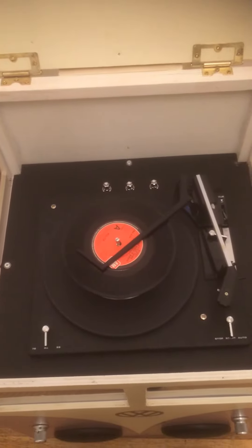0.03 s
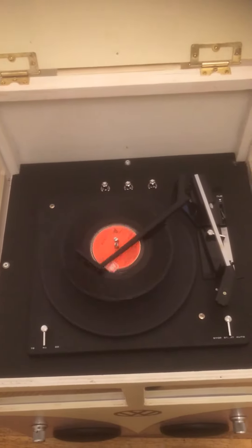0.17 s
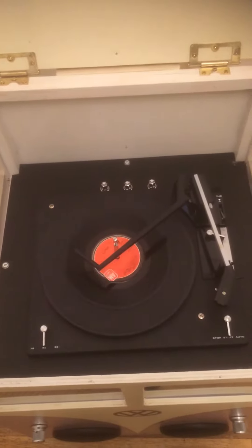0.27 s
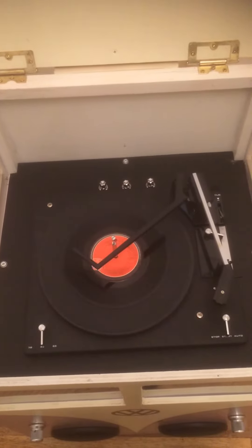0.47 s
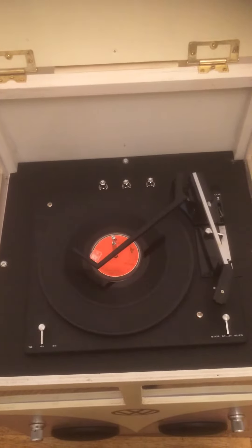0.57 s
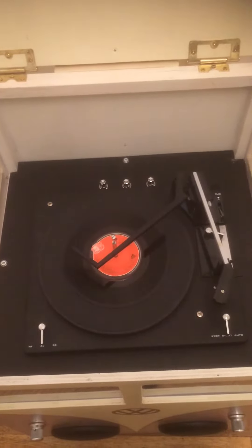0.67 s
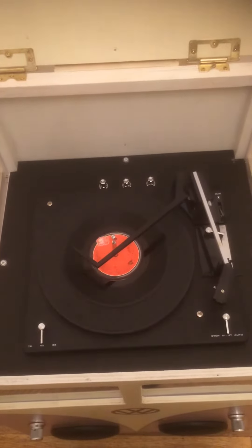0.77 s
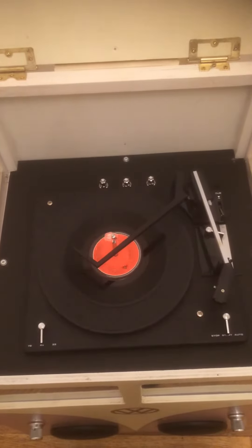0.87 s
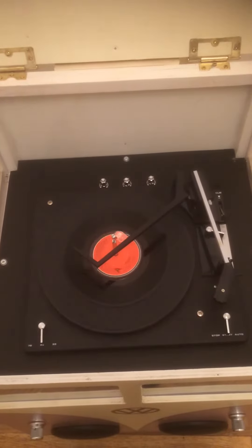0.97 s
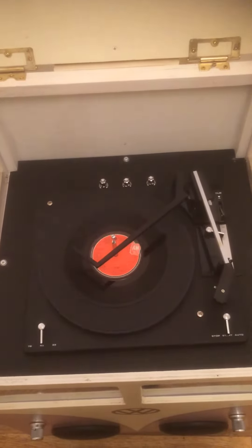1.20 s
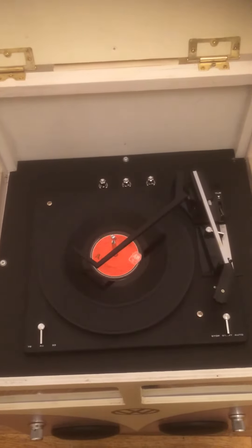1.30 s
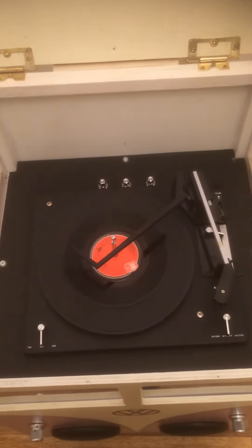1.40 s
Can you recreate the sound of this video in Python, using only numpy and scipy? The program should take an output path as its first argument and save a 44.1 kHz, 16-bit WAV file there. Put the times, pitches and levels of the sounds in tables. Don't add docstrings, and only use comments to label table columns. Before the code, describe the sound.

A record changer in a wooden case, heard close in a quiet room: faint tick, a disc drops with a rattling thump, a spring pings, the arm linkage clunks hard, then later a bright latch snap.

```python
import sys
import numpy as np
from scipy import signal
from scipy.fft import rfft, irfft
from scipy.io import wavfile
from scipy.ndimage import uniform_filter1d

SR = 44100
rng = np.random.default_rng(int(sys.argv[2]) if len(sys.argv) > 2 else 0)


def nominal_scale(level):
    x = np.asarray(level, float) / 20
    return 10 ** x


def to_wav(sig):
    pcm = np.clip(np.atleast_2d(sig), -1, 1) * 32767
    pcm = np.round(pcm).astype(np.int16)
    wavfile.write(sys.argv[1], SR, pcm.T)


N = 63945

# start in seconds, level in dB.
GRAZE_HITS = [
    (.2113, -41.5),
]
# frequency in Hz, level in dB.
GRAZE_COLOUR = [(2000, -22), (3500, -11), (5300, -10.5), (9000, -29), (15000, -22)]
# start in seconds, level in dB.
RIM_HITS = [
    (.2185, -34.5),
    (.2225, -37),
    (.2255, -37.5),
    (.2290, -29),
    (.2325, -33.5),
    (.2395, -33),
    (.2480, -39.5),
]
# frequency in Hz, level in dB, T60 in seconds.
DISC_MODES = [(919, -9.5, 0.2), (1347, -3, 0.071), (1850, -12, 0.11), (1925, -2, 0.051),
              (2782, -5.5, 0.097), (3740, -7.5, .09), (4392, -10.5, 0.053), (5170, -4.5, 0.031),
              (5500, -21, 0.039), (7000, -4, 0.018), (6760, -7, 0.042), (8390, -4.5, 0.029),
              (8700, -20, 0.028), (11300, -12, .04)]
# frequency in Hz, level in dB.
RATTLE_COLOUR = [(180, -15), (300, -7.5), (689, -26), (870, -20.5), (2000, -5.5), (2520, -15.5),
                 (8500, -22), (16000, -35)]
# start in seconds, level in dB.
DECK_PUSHES = [
    (.2183, -36.5),
    (.2249, -39.5),
    (.2400, -37),
    (.2700, -39),
    (.3045, -30),
    (.3100, -34),
    (.4400, -52),
    (1.2150, -56),
    (1.3850, -53),
]
# frequency in Hz, level in dB, T60 in seconds.
DECK_MODES = [(188, -4.5, 0.046), (212, -1.5, 0.14), (284, 0, 0.068), (510, -3.5, 0.065), (80, -12, 0.096)]
# start in seconds, level in dB, seconds until it settles.
DECK_BOUNCES = [
    (.2183, -37.5, .046),
    (.2249, -29, 0.072),
    (.3045, -35, 0.054),
    (.3400, -42.5, 0.059),
]
# start in seconds, level in dB.
THUD_HITS = [
    (1.3350, -54.5),
    (1.3550, -58),
]
# frequency in Hz, level in dB.
THUD_COLOUR = [(40, 3), (80, 1), (350, -5), (600, -14), (1200, -33.5)]
# start in seconds, level in dB, seconds until it is caught.
LEVER_PINGS = [
    (0.202, -48.5, 0.0058),
    (.2660, -20, 0.016),
]
# start in seconds, level in dB, seconds until it is caught.
LEVER_RINGS = [
    (.3100, -34, .195),
]
# start in seconds, level in dB.
ARM_BLOWS = [
    (.2985, -25),
    (.3042, -26),
    (.3062, -20),
    (.3100, -21.5),
    (.3190, -28.5),
    (.3255, -30),
]
# frequency in Hz, level in dB, T60 in seconds.
CHASSIS_MODES = [(780, -19, 0.0206), (939, 5, 0.037), (1030, -8, 0.015), (1080, -22, 0.015),
                 (1236, 3.5, .04), (1300, 1.5, 0.039), (1444, 0, .04), (1671, -7.5, 0.08),
                 (1830, -35, 0.047), (2048, -5, .07), (2927, -2, 0.014), (3467, -14, 0.022),
                 (4610, -18, .02), (5530, -15, .015)]
# frequency in Hz, level in dB.
BLOW_COLOUR = [(300, -18.5), (620, -12.5), (1100, 7.5), (2100, -5), (4000, -11.5), (7000, -24),
               (12000, -32), (17000, -52)]
# frequency in Hz, level in dB.
TICK_COLOUR = [(3000, -18), (5000, -4.5), (8500, 3), (11000, -7), (12500, -29), (17000, -19)]
# start in seconds, level in dB.
LATCH_SLIP = [
    (1.1605, -50),
]
# start in seconds, level in dB.
LATCH_SNAPS = [
    (1.1632, -28),
    (1.1645, -27),
    (1.1657, -28.5),
    (1.1685, -28.5),
    (1.1750, -48),
]
# frequency in Hz, level in dB, T60 in seconds.
LATCH_MODES = [(868, -8.5, 0.05), (1060, -9, 0.048), (1539, -3, 0.056), (1734, -8, 0.1),
               (2010, -5.5, 0.013), (2430, -14, 0.034), (4350, -3, 0.02), (5270, 1.5, 0.013),
               (6140, -1, 0.028), (8500, -5, 0.042), (10230, 6.5, 0.017), (11960, -19, 0.023),
               (11300, -24, 0.034), (13800, -13, 0.022)]
# frequency in Hz, level in dB.
SNAP_COLOUR = [(180, -30), (300, -13), (865, -18), (1230, -7.5), (1970, -5.5), (3430, -11.5),
               (10800, -11.5), (15800, -10), (16700, -54)]
# start in seconds, level in dB, pitch in Hz, crack level in dB.
GEAR_TEETH = [
    (0.119, -63, 1140, 4),
    (0.1811, -55, 1300, 3.5),
    (0.624, -60, 1940, -2),
    (0.782, -59.5, 1625, -24),
    (0.859, -62, 1990, -10),
    (.9390, -52.5, 1627, -17),
    (1.3828, -58, 1000, 6.5),
    (1.386, -52.5, 1567, 0.5),
    (1.400, -59, 1820, -8),
]
# frequency in Hz, level in dB.
TOOTH_COLOUR = [(300, -5), (900, -4), (2000, -5.5), (3500, -8.5), (4500, -26), (6500, -18), (12000, -37)]
# frequency in Hz, T60 in seconds.
ROOM_DECAY = [(100, 0.43), (300, .35), (1000, 0.41), (2000, 0.46), (4000, 0.42), (8000, 0.34),
              (15000, 0.22)]
# frequency in Hz, line width in Hz, level in dB.
MOTOR_HUM = [
    (60, 12, -69),
    (154, 20, -72),
]
# frequency in Hz, level in dB.
HISS_COLOUR = [(20, -13), (60, -15), (156, -8.5), (300, -14), (620, -18), (1400, -19.5), (3000, -28),
               (15300, -36)]
# frequency in Hz, level
# in dB.
MIC_TONE = [(15, -28), (45, -3.5), (90, -1), (480, -0.5), (620, -2), (800, -1),
            (15600, 0), (16000, -20), (16800, -28), (17000, -90)]


def read(points, hz):
    f, value = np.transpose(points)
    return np.interp(np.log(hz + 1), np.log(f + 1), value)


def add(mix, s, sound):
    part = mix[round(s * SR):][:len(sound)]
    part += sound[:len(part)]


def noise(colour, size):
    spectrum = rfft(rng.standard_normal(size))
    x = irfft(spectrum * nominal_scale(read(colour, np.fft.rfftfreq(size, 1 / SR))), size)
    return x / x.std()


def strike(hits, modes, spread_db=3.0, crack=None, crack_db=0, crack_t60=0.1):
    out, t = np.zeros(N), np.arange(SR // 2) / SR
    hz, db, t60 = np.transpose(modes)[:, :, None]
    contact_s, pitch_scatter = 0.0006, 0.025
    for s, hit_db in hits:
        place_db = spread_db * rng.standard_normal(hz.shape)
        pitch = 1 + pitch_scatter * rng.standard_normal(hz.shape)
        sides = rng.choice([-1, 1, 1], hz.shape)
        fall = nominal_scale(db + place_db - 60 * t / t60)
        ring = (fall * sides * np.sin(2 * np.pi * hz * pitch * t)).sum(0)
        sound = ring / np.linalg.norm(nominal_scale(db))
        if crack is not None:
            sound = sound + noise(crack, len(t)) * nominal_scale(crack_db - 60 * t / crack_t60)
        add(out, s, nominal_scale(hit_db) * sound * np.minimum(t / contact_s, 1))
    return out


def burst(hits, colour, t60):
    return strike(hits, [(1000, 0, 1e-5)], 0, colour, 0, t60)


def held(rows, hz, t60, caught_t60):
    out, t = np.zeros(N), np.arange(SR // 2) / SR
    attack = np.minimum(t / 0.00064, 1)
    for s, db, free_s in rows:
        fall_db = 60 * t / t60 + 60 * np.maximum(t - free_s, 0) / caught_t60
        add(out, s, nominal_scale(db - fall_db) * attack * np.sin(2 * np.pi * hz * t))
    return out


def landing():
    graze = burst(GRAZE_HITS, GRAZE_COLOUR, t60=0.05)
    rattle = strike(RIM_HITS, DISC_MODES, 3.0, RATTLE_COLOUR, crack_db=2, crack_t60=0.037)
    deck = strike(DECK_PUSHES, DECK_MODES)
    thuds = burst(THUD_HITS, THUD_COLOUR, t60=0.16)
    return graze + rattle + deck + thuds


def deck_bounce():
    return held(DECK_BOUNCES, hz=151, t60=0.26, caught_t60=0.04)


def linkage():
    tick = burst([(0.2982, -25)], TICK_COLOUR, t60=0.0063)
    blows = strike(ARM_BLOWS, CHASSIS_MODES, 1.7, BLOW_COLOUR, crack_db=-3.5, crack_t60=0.03)
    return blows + tick


def lever():
    pings = held(LEVER_PINGS, hz=1297, t60=0.085, caught_t60=0.012)
    rings = held(LEVER_RINGS, hz=1321, t60=0.5, caught_t60=0.5)
    return pings + rings


def latch():
    slip = strike(LATCH_SLIP, LATCH_MODES[2:6])
    snap = strike(LATCH_SNAPS, LATCH_MODES, 2.5, SNAP_COLOUR, crack_db=-5.5, crack_t60=0.064)
    return slip + snap


def gears():
    out, tooth_t60 = np.zeros(N), 0.042
    for s, db, hz, crack_db in GEAR_TEETH:
        modes = [(hz, 0, tooth_t60), (hz * 1.15, -6, tooth_t60)]
        out = out + strike([(s, db)], modes, 0, TOOTH_COLOUR, crack_db, crack_t60=0.035)
    return out


def room(x):
    delay_s, blur_hz = 0.0038, 25
    hz, t, z = signal.stft(rng.standard_normal(SR), SR, nperseg=256)
    fall = nominal_scale(-60 * t / read(ROOM_DECAY, hz)[:, None])
    tail = signal.istft(z * fall, SR, nperseg=256)[1]
    tail = tail * np.clip(np.arange(len(tail)) / SR / delay_s - 1, 0, 1)
    wet = signal.hilbert(signal.fftconvolve(x, tail / np.linalg.norm(tail))[:N])
    wander = np.cumsum(rng.standard_normal(N)) * np.sqrt(2 * np.pi * blur_hz / SR)
    drift = uniform_filter1d(wander, size=64)
    return (wet * np.exp(1j * drift)).real


def floor():
    hz = np.fft.rfftfreq(N, 1 / SR)
    out = nominal_scale(-65) * noise(HISS_COLOUR, N)
    for hum_hz, width_hz, db in MOTOR_HUM:
        line = 1 / (1 + (2 * (hz - hum_hz) / width_hz) ** 2)
        tone = irfft(rfft(rng.standard_normal(N)) * line, N)
        out = out + nominal_scale(db) * tone / tone.std()
    return out


def scene():
    near = landing() + linkage() + latch() + gears()
    ping = lever()
    bounce = deck_bounce()
    send = near + nominal_scale(-7) * ping + nominal_scale(-11) * bounce
    mix = near + ping + bounce + nominal_scale(-7) * room(send) + floor()
    return mix[None]


def low_pass(x):
    return signal.sosfilt(signal.butter(12, 16810, fs=SR, output="sos"), x)


def record(dry):
    db = read(MIC_TONE, abs(np.fft.fftfreq(8192, 1 / SR)))
    response = np.exp(np.conj(signal.hilbert(np.log(nominal_scale(db)))))
    taps = np.fft.ifft(response).real[:4096]
    mix = signal.oaconvolve(dry, taps[None])[:, :N]
    return low_pass(mix)


dry = scene()
out = record(dry)
to_wav(out)
```